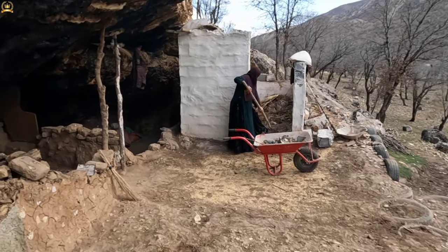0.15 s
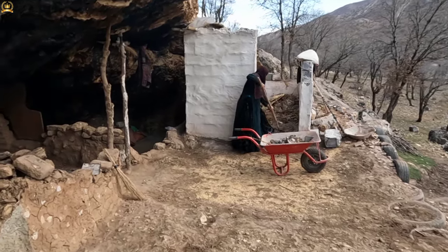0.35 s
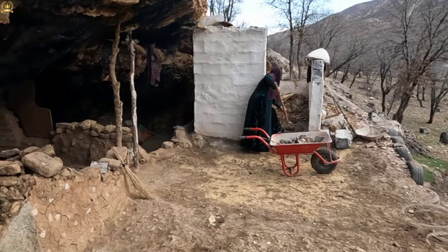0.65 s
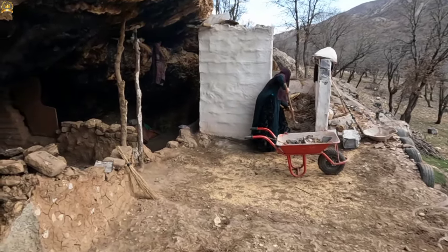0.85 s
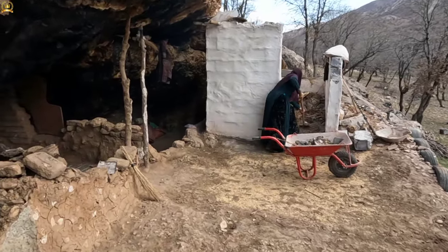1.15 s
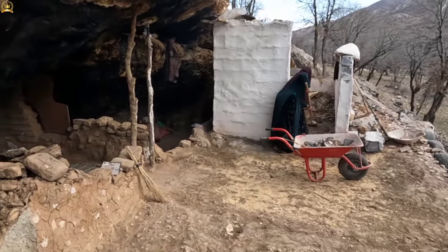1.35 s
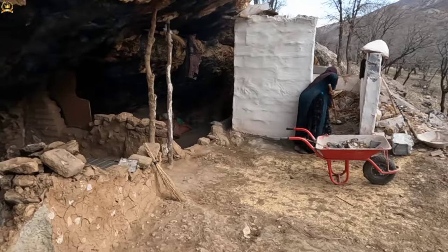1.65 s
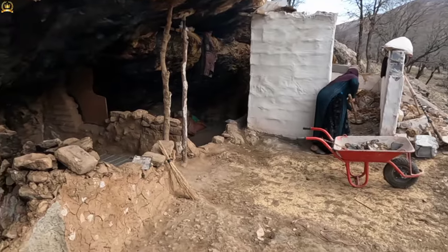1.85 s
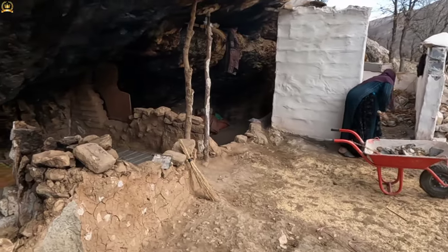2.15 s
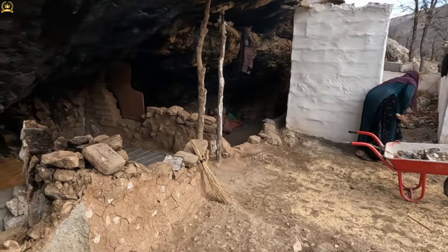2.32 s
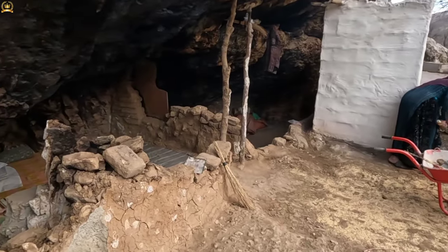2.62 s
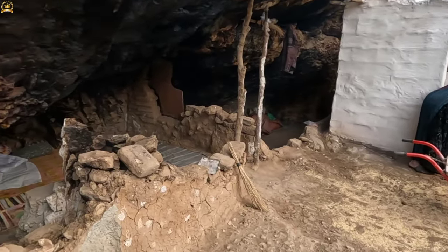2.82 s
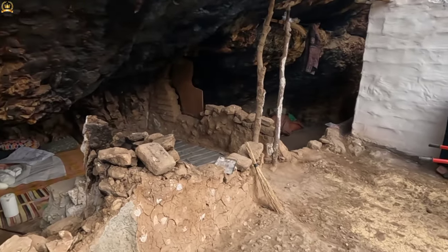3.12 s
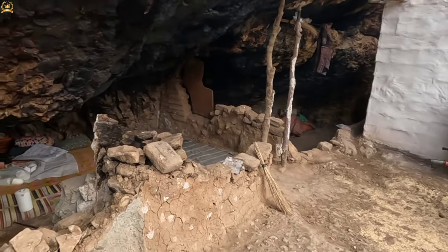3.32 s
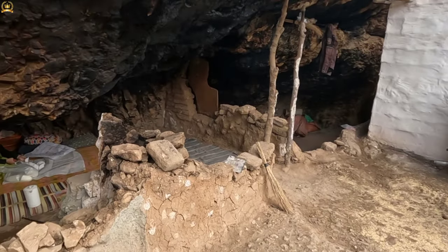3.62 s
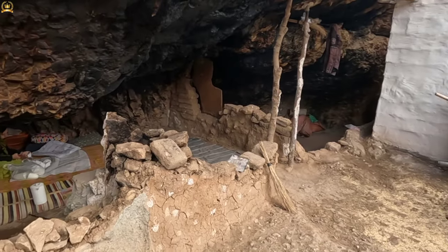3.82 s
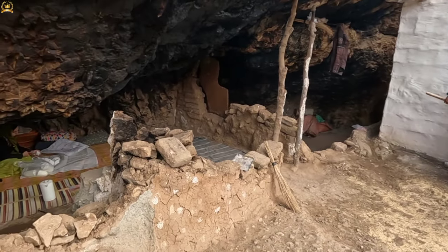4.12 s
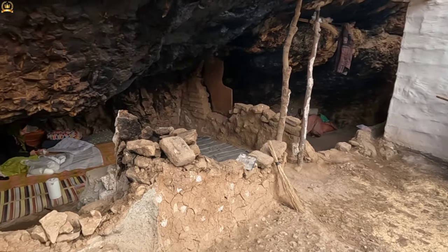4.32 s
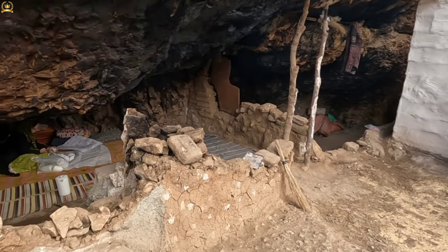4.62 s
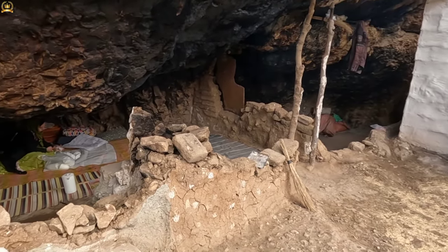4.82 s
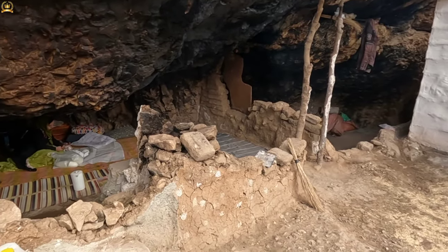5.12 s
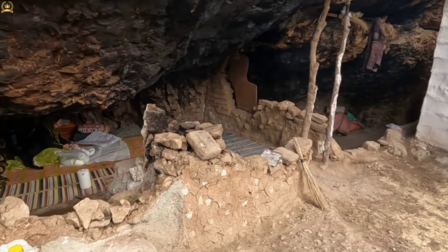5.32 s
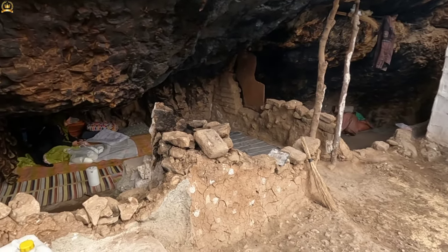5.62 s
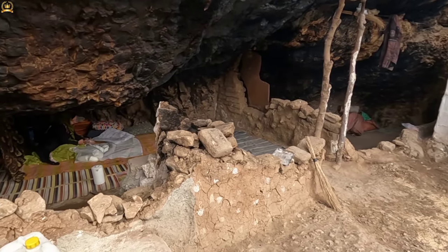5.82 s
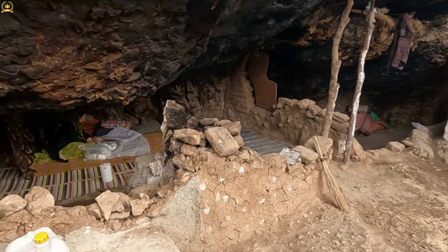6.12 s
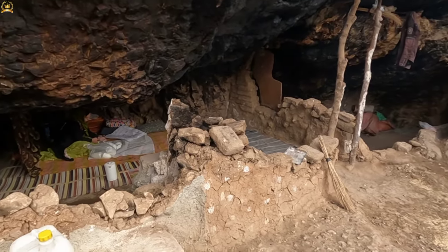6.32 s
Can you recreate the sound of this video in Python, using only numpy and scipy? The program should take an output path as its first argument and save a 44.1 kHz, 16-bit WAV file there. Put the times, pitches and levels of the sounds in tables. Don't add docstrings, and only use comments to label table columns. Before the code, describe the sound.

Digging in a stony yard under a rock overhang, heard from a hand-held camera. Light scratches and knocks grow into busy scraping with pebbles ticking on steel, then a strong jab and a lull. Tiny high bird peeps lead into the loudest cluster, earth and stones drumming dully into a metal wheelbarrow. The sound thins, then rattling scrapes return. Soft far water, low wind and dull handling thumps lie beneath.

```python
import sys
import numpy as np
from scipy import signal
from scipy.fft import rfft, irfft, next_fast_len
from scipy.io import wavfile
from scipy.ndimage import uniform_filter1d

SR = 44100
rng = np.random.default_rng(int(sys.argv[2]) if len(sys.argv) > 2 else 0)


def gain_from_decibels(decibels):
    exponent = np.asarray(decibels, float) / 20
    return 10 ** exponent


def transcribe(signal):
    frames = np.atleast_2d(signal).T
    limited = np.clip(frames, -1, 1)
    pcm = np.round(limited * 32767).astype(np.int16)
    wavfile.write(sys.argv[1], SR, pcm)


N = 284886


def evened(x):
    return x / np.sqrt(np.mean(x ** 2) + 1e-20)


def read(points, hz):
    point_hz, value = np.transpose(points)
    return np.interp(np.log(hz + 1), np.log(point_hz + 1), value)


def add(mix, start_s, sound):
    part = mix[..., max(round(start_s * SR), 0):][..., :sound.shape[-1]]
    part += sound[..., :part.shape[-1]]


def coloured(x, gain_db):
    hz = abs(np.fft.fftfreq(8192, 1 / SR))
    log_gain = np.maximum(gain_db(hz), -100) * np.log(10) / 20
    taps = np.fft.ifft(np.exp(np.conj(signal.hilbert(log_gain)))).real[:4096]
    return signal.oaconvolve(x, taps)[:len(x)]


def fence(hz, lo_hz, hi_hz):
    return -10 * np.log10((1 + (lo_hz / (hz + 1)) ** 6) * (1 + (hz / hi_hz) ** 6))


def resonate(x, hz, width_hz):
    turn = np.exp(2j * np.pi * np.cumsum(hz) / SR)
    r = np.exp(-np.pi * width_hz / SR)
    return 2 * (turn * signal.lfilter([1 - r], [1, -r], x / turn)).real


def peak(t, top_s, db, swell_s, fade_s, rounding):
    away = np.where(t < top_s, (top_s - t) / swell_s, (t - top_s) / fade_s)
    return gain_from_decibels(db - 20 * away ** rounding)


def hiss(gain_db, same, patchy_db, size):
    hz = np.fft.rfftfreq(size, 1 / SR)
    a, b, c, d, patches = rng.standard_normal((4 * N // size + 5, len(hz), 5)).T
    patches = uniform_filter1d(patches, size=9, axis=0)
    patches = evened(uniform_filter1d(patches, size=9, axis=1))
    same = np.clip(same * np.ones(len(hz)), -1, 1)[:, None]
    left = a + 1j * b
    right = same * left + np.sqrt(1 - same ** 2) * (c + 1j * d)
    frame_s = np.arange(a.shape[1]) * size / 4 / SR
    z = np.array([left, right]) * gain_from_decibels(gain_db(hz[:, None], frame_s) + patchy_db * patches)
    return evened(signal.istft(z, nperseg=size, noverlap=3 * size // 4)[1][:, :N])


def grains(count, per_s, spread_db):
    size = gain_from_decibels(spread_db * np.minimum(rng.exponential(1, count), 5))
    size = size * rng.choice([-1, 1], count)
    return size * (rng.random(count) < per_s / SR)


def valley():
    # start_s, rush_db, centre_hz
    water = [
        (0.0, -46.5, 1220),
        (1.15, -44.5, 1406),
        (1.69, -49, 1370),
        (2.39, -60, 1176),
        (4.32, -50, 1225),
        (5.27, -53.5, 1244),
        (5.828, -51, 1256),
        (6.46, -47, 1315),
    ]
    # pitch_hz, level_db
    open_air = [(53, -39), (90, -1), (114, -8), (191, -3), (270, -21.5), (551, -17), (866, -17),
                (1100, -8.5), (1300, -17.5), (1450, -13.5), (2390, -29), (7650, -35), (9690, -64.5),
                (11500, -35.5), (15600, -97)]
    # pitch_hz, likeness (0 to 1)
    likeness = [(60, 1), (180, 0.76), (550, 0.74), (1650, 0.65), (4970, 0.51), (15000, 0.14)]
    start_s, rush_db, rush_hz = np.transpose(water)
    same = read(likeness, np.fft.rfftfreq(1024, 1 / SR))

    def band_db(hz, t):
        off_centre = (hz - np.interp(t, start_s, rush_hz)) / 150
        return -20 * np.log10(1 + off_centre ** 2) + fence(hz, 1630, 3360)

    def hush_db(hz, t):
        murmur_db = 10.5 - 2.5 * t
        return read(open_air, hz) + gain_from_decibels(fence(hz, 190, 1350)) * murmur_db

    rush = hiss(band_db, same, patchy_db=1.66, size=1024)
    hush = hiss(hush_db, same, patchy_db=-2.2, size=1024)
    t = np.arange(N) / SR
    return gain_from_decibels(np.interp(t, start_s, rush_db) - 8.0) * rush + gain_from_decibels(-59.0) * hush


def wind_buffet():
    # pitch_hz, level_db
    gust = [(15, -22), (25, -8.5), (38, -11), (65, -9.5), (87, -38), (121, -27), (400, -38.5), (520, -47),
            (880, -120)]
    return hiss(lambda hz, t: read(gust, hz), 0.87, patchy_db=2.0, size=4096)


def wind(buffet):
    # start_s, level_db
    strength = [(0.0, -47.5), (0.52, -53.5), (0.59, -43), (0.7, -54.5), (1.02, -55.5), (1.33, -52),
                (1.6, -55), (2.57, -55.5), (3.71, -58), (4.59, -50), (4.75, -40.5), (4.95, -59),
                (5.59, -57.5), (6.26, -48.5), (6.46, -48)]
    # middle_s, level_db, swell_and_fade_s
    sways = [
        (0.5, -31, .3),
        (1.32, -26, .5),
        (3.2, -39, 3.5),
        (4.65, -32, .3),
        (6.15, -40, .4),
    ]
    t = np.arange(N) / SR
    sway = hiss(lambda hz, t: 2 * fence(hz, 6, 21), 0.85, patchy_db=1.0, size=8192)
    sway_level = sum(peak(t, at_s, db, span_s, span_s, 1) for at_s, db, span_s in sways)
    lean = gain_from_decibels(np.array([[-1.5], [1.5]]))
    lumps = gain_from_decibels(2.5 * evened(uniform_filter1d(rng.standard_normal(N), size=2000)))
    start_s, buffet_db = np.transpose(strength)
    return sway_level * sway * lean + gain_from_decibels(np.interp(t, start_s, buffet_db) + 2.5) * buffet * lumps


def hand(buffet):
    # start_s, level_db, swing_hz, rise_s, decay_s
    presses = [(0.71, -24.5, 50, 0.0072, 0.016), (1.212, -41, 202, 0.0016, 0.012),
               (2.065, -26, 59, 0.012, 0.011), (2.661, -20, 24.6, 0.0083, 0.025),
               (3.332, -33.5, 34, 0.0015, 0.0096), (3.512, -27, 52, 0.0043, 0.013),
               (4.656, -22, 26.5, 0.01, 0.018), (4.7112, -9.5, 25, 0.0015, 0.019),
               (5.124, -14.5, 6.7, 0.011, 0.025), (5.42, -21.5, 58, 0.014, 0.008),
               (6.216, -14, 66, 0.017, 0.014)]
    # start_s, level_db, swing_hz, rise_s, decay_s
    releases = [
        (0.467, -26, 58, .003, 0.016),
        (0.459, -18.5, 38, 0.00098, 0.0056),
        (0.51, -18, 20.8, 0.0093, 0.035),
        (5.1435, -20.5, 12, 0.0028, 0.025),
        (5.1935, -25, 37, 0.0031, 0.012),
        (5.258, -32, 35, 0.0064, 0.012),
        (2.24, -30, 50, 0.0043, 0.012),
        (4.7101, -23.5, 840, 0.00027, .0012),
    ]
    out = np.zeros((2, N))
    t = np.arange(8000) / SR
    creak = evened(np.diff(buffet, 2, prepend=0, append=0))
    bumps = [(1, *bump) for bump in presses] + [(-1, *bump) for bump in releases]
    for sign, start_s, db, swing_hz, rise_s, decay_s in bumps:
        swing = (1 - np.exp(-(t / rise_s) ** 2)) * np.exp(-t / decay_s) * np.cos(2 * np.pi * swing_hz * t)
        add(out, start_s, sign * gain_from_decibels(db + np.array([[-1.5], [1.2]])) * swing)
        shudder = creak[:, round(start_s * SR):][:, :len(t)]
        shape = np.sqrt(t / 0.013 * np.exp(1 - t / 0.0074))
        add(out, start_s, gain_from_decibels(db - 29) * shudder * shape[:shudder.shape[1]])
    return out


def pebbles(count, t60_s, spread_db):
    n = np.arange(750)
    when, loud, *tones = rng.random((count, 4)).T[:, :, None]
    rings = 0
    for tone in tones:
        hz = 850 * 12. ** tone
        fall = gain_from_decibels(-60 * n / SR / (t60_s * np.sqrt(2000 / hz)))
        rings = rings + np.sin(2 * np.pi * hz * n / SR) * fall
    rings = rings * gain_from_decibels(spread_db * np.minimum(-np.log(loud), 3.4))
    rings = rings * np.cos(.5 * np.pi * n / len(n))
    places = (when * N).astype(int) + n
    return evened(np.bincount(places.ravel(), rings.ravel(), N)[:N])


def loose_grit():
    clumps = gain_from_decibels(1.64 * evened(uniform_filter1d(rng.standard_normal(N), size=300)))
    dust = evened(grains(N, 5000, 4.2)) + 0.84 * rng.standard_normal(N)
    return clumps * (0.61 * dust + 0.67 * pebbles(count=8000, t60_s=0.046, spread_db=1.5))


def blade_layers(grit):
    # pitch_hz, level_db
    grit_colour = [(150, -66), (250, 1), (693, 3), (824, -5.5), (1110, 0.5), (2030, 2.5), (2290, -2.5),
                   (3180, 6.5), (7800, -3), (12000, -19), (15600, -34)]
    # pitch_hz, width_hz, level_db
    blade = [(1100, 59, 0), (1540, 310, -6.5), (1930, 13.5, -5), (2500, 160, 1.5), (2760, 83, -3),
             (3064, 40, -8.5), (3625, 44, -5.5)]
    # start_s, pitch_hz
    scoop = [(1.0, 1490), (1.78, 1550), (1.84, 1580), (1.96, 880), (2.3, 1370), (2.77, 1340), (3.3, 1164),
             (4.43, 1500), (4.61, 1420), (4.734, 945), (5.274, 1190), (6.07, 1300), (6.2, 1640),
             (6.46, 1310)]

    def steel_db(hz):
        rings = sum(gain_from_decibels(db + 4.0) / (1 + (2 * (hz - f) / (0.95 * width)) ** 2) for f, width, db in blade)
        return read(grit_colour, hz) + 10 * np.log10(1 + rings)

    earth = evened(coloured(grit, lambda hz: steel_db(hz) + fence(hz, 770, 1530)))
    rattle = evened(coloured(grit, lambda hz: steel_db(hz) + fence(hz, 2195, 7320)))
    sand = evened(coloured(grit, lambda hz: read(grit_colour, hz) + fence(hz, 5100, 28000)))
    hollow_hz = np.interp(np.arange(N) / SR, *np.transpose(scoop))
    hollow = evened(resonate(earth, hollow_hz, width_hz=620))
    return rattle, 0.53 * earth + 0.67 * hollow, sand


def strokes(rattle, earth, sand):
    # hardest_s, rattle_db, swell_s, fade_s, earth_weight_db
    drags = [(0.04, -63.5, 0.13, 0.013, -32), (0.331, -50, 0.021, 0.14, 1.5), (0.64, -51, 0.24, 0.057, -3),
             (1.06, -51, 0.094, 0.4, 3), (1.22, -59, 0.25, 0.53, -6), (1.654, -42.5, 0.04, 0.14, -16),
             (1.75, -33.5, 0.11, 0.093, -3.5), (1.89, -52, 0.1, 0.064, 6), (2.05, -63.5, 0.091, 0.18, -1),
             (2.415, -46, 0.095, 0.07, -1), (2.69, -58.5, 0.13, .03, -65), (2.773, -33, 0.076, 0.047, -2.5),
             (2.84, -53.5, 0.031, 0.045, -4), (2.99, -60.5, 0.094, 0.12, 0.5),
             (3.12, -61.5, 0.071, 0.12, -4), (1.94, -66, .1, 0.09, -5), (1.56, -65, 0.12, .1, -6),
             (4.552, -48.5, 0.078, 0.25, 4), (4.7, -45, 0.084, 0.38, -40), (4.99, -48, .08, 0.26, -6),
             (4.83, -46.5, 0.21, 0.09, 0.5), (4.905, -35, 0.01, 0.13, 6.5), (5.12, -55, 0.074, 0.23, 2.5),
             (5.26, -63, 0.04, 0.068, -2.5), (6.048, -42.5, 0.041, 0.14, -1), (6.2, -41, 0.025, 0.21, -7),
             (6.32, -38.5, 0.097, 0.25, -5), (6.438, -42.5, .12, 0.061, -4.5)]
    # hardest_s, rattle_db, fade_s, earth_weight_db
    jolts = [(0.49, -52, .1, 1), (2.36, -54, 0.11, -20), (0.304, -54.5, .1, 7.5),
             (5.982, -54.5, 0.23, -1.5), (0.153, -43, 0.058, -16), (0.512, -39, 0.037, -6),
             (1.12, -37, 0.061, -3), (1.52, -43, 0.02, -14), (1.982, -47, 0.041, -5),
             (2.709, -42.5, 0.13, 8), (4.866, -33, 0.064, -42), (5.066, -33, 0.048, -50),
             (5.546, -65.5, 0.29, 1.5), (6.134, -41, 0.03, -22)]
    t = np.arange(N) / SR
    steps = t[::64]
    moves = [(*drag, 1.44) for drag in drags]
    moves += [(top_s, db, 0.012, fade_s, weight_db, 1.05) for top_s, db, fade_s, weight_db in jolts]
    power = 0
    for top_s, db, swell_s, fade_s, weight_db, rounding in moves:
        sand_db = -6.5 - 0.11 * (db + 45) - 0.098 * weight_db
        shares = gain_from_decibels(np.array([[0], [weight_db], [sand_db]]))
        power = power + (peak(steps, top_s, db, swell_s, fade_s, rounding) * shares) ** 2
    layers = zip(power, (rattle, earth, sand))
    return sum(np.interp(t, steps, np.sqrt(p)) * layer for p, layer in layers)


def trickle(rattle, sand):
    level_db = np.interp(np.arange(N) / SR, [0.8, 1.2, 2.2, 3.7], [-83.0, -82.0, -74.5, -84.0])
    return gain_from_decibels(level_db) * (rattle + 2.24 * sand)


def slide(grit):
    t = np.arange(N) / SR
    sinking_hz = np.clip(1430 - 9000 * (t - 1.9), 600, 2200)
    level = peak(t, 1.9, db=-50, swell_s=0.06, fade_s=0.11, rounding=1.44)
    return level * evened(resonate(grit, sinking_hz, width_hz=360))


def singing(grit):
    # start_s, length_s, pitch_hz, level_db
    sings = [(0.32, 0.049, 4100, -57.5), (0.325, 0.025, 3120, -54), (0.37, 0.064, 4160, -63),
             (0.34, .09, 8570, -67), (0.36, .08, 7200, -76), (0.485, 0.075, 2710, -56),
             (0.52, 0.045, 4300, -59), (0.583, 0.08, 8900, -64), (0.61, 0.037, 3640, -63),
             (0.6, 0.077, 6140, -65), (1.042, 0.026, 2650, -48), (1.045, 0.033, 1610, -48),
             (1.11, 0.038, 2850, -50), (1.105, 0.022, 3030, -48), (1.185, 0.03, 2300, -57),
             (1.185, 0.027, 1730, -43.5), (1.31, .07, 3090, -64), (1.405, 0.037, 4250, -68),
             (1.413, .035, 1580, -46.5), (1.42, .04, 3127, -58), (1.52, 0.03, 3500, -58.5),
             (1.662, .11, 3340, -44.5), (1.715, .04, 2500, -46), (1.7, 0.056, 1700, -41),
             (1.69, 0.14, 4590, -55), (4.51, 0.047, 1890, -49), (4.51, 0.086, 2590, -50),
             (4.51, 0.09, 2760, -51), (4.55, 0.055, 1747, -47), (4.545, 0.15, 1127, -53.5),
             (4.56, 0.083, 1404, -51), (4.46, 0.044, 1940, -62), (4.62, .03, 2950, -55),
             (4.74, 0.11, 4930, -57.5), (4.77, 0.065, 3520, -56.5), (6.0, 0.15, 1730, -51),
             (6.035, 0.047, 1153, -45.5), (6.035, .04, 3530, -50), (6.04, 0.036, 4700, -55),
             (6.06, 0.04, 1900, -57), (6.13, 0.13, 3110, -49.5), (6.13, 0.086, 2560, -45),
             (6.13, 0.018, 3780, -43), (6.19, 0.041, 1920, -44), (6.21, 0.068, 1530, -50),
             (6.26, 0.14, 3100, -51), (6.26, .2, 2495, -45), (6.3, .16, 1634, -47), (6.3, 0.11, 2775, -56),
             (6.3, 0.14, 1114, -46.5)]
    out = np.zeros(N)
    for start_s, length_s, hz, db in sings:
        feed = grit[round(start_s * SR):][:round(1.3 * length_s * SR)]
        width_hz = hz / 60 * max(1, hz / 5000) ** 2
        ring = resonate(feed, np.full(len(feed), float(hz)), width_hz)
        u = np.linspace(0, 1, len(feed))
        swell = np.minimum(u / 0.2, 1) * np.cos(.5 * np.pi * u ** 2)
        add(out, start_s, gain_from_decibels(db) * evened(ring) * swell)
    return out


def scrape():
    grit = loose_grit()
    rattle, earth, sand = blade_layers(grit)
    return strokes(rattle, earth, sand) + trickle(rattle, sand) + slide(grit) + singing(grit)


def barrow():
    # start_s, peak_db, tumble_s, boom_db
    clods = [(1.215, -28, 0.0079, -46), (2.703, -33.5, 0.058, -34), (2.739, -32.5, 0.035, -34),
             (3.122, -45, 0.033, -14), (4.725, -31.5, 0.036, -12.5), (4.802, -20, 0.029, -29),
             (4.822, -18.5, 0.014, -19.5), (4.861, -23.5, 0.058, -38), (4.904, -14, 0.035, -19),
             (4.94, -19, 0.027, -19.5), (5.007, -36.5, 0.14, -20), (0.137, -50, 0.015, -19),
             (1.051, -45, .02, -13.5), (1.128, -43.5, 0.024, -12), (1.701, -41.5, 0.1, -27),
             (1.789, -41.5, 0.027, -24), (2.387, -42.5, .04, -34), (3.176, -48.5, 0.023, -26),
             (4.561, -40, 0.052, -21), (5.24, -49, 0.045, -15), (6.06, -40, .03, -35),
             (6.147, -46.5, 0.015, -13), (6.297, -55, .04, -20), (6.366, -43, 0.044, -19.5)]
    # pitch_hz, level_db, t60_s (time to fall 60 dB)
    tray_rings = [(445, -10.5, 0.85), (488, 3.5, 0.98), (641, 5.5, 0.42), (701, 4, 0.42), (734, 9, 0.55),
                  (799, 8, 0.28), (994, 7, 0.55), (1040, 3, 0.36), (1154, 1, 0.54), (1225, 0, 0.453),
                  (1290, 5, 0.19), (1460, -2, 0.5), (1730, -4, 0.31), (2010, -19, 0.28)]
    # pitch_hz, level_db
    heap = [(150, -48), (250, 9.5), (538, 0), (983, 4), (1860, -2.5), (3100, -11), (4000, -29), (5200, -34),
            (8800, -120)]
    t = np.arange(9000) / SR
    drive, boom = np.zeros(N), np.zeros(N)
    for start_s, db, tumble_s, boom_db in clods:
        tumble = np.exp(-t / tumble_s) * evened(grains(len(t), 3000, 2.2))
        tumble[:60] += 0.48 * np.hanning(60) ** 4
        add(drive, start_s, gain_from_decibels(db) * tumble)
        swell = (1 - np.exp(-t / 0.0073)) * gain_from_decibels(-60 * t / 0.14)
        add(boom, start_s, gain_from_decibels(db + boom_db + 16.0) * swell * np.sin(2 * np.pi * 176.2 * t))
    tray = 0
    for hz, db, t60_s in tray_rings:
        damped_s = np.clip(0.24 * t60_s, .05, .25)
        tray = tray + gain_from_decibels(db - 60 * t / damped_s) * np.sin(2 * np.pi * hz * t)
    dull = coloured(np.eye(1, 4096)[0], lambda hz: read(heap, hz))
    body = 0.77 * tray[:4096] / np.linalg.norm(tray) + 1.04 * dull / np.linalg.norm(dull)
    return gain_from_decibels(-11.0) * signal.oaconvolve(drive, body)[:N] + boom


def knocks():
    # start_s, peak_db, ring_hz, thud_db, t60_s
    chips = [(0.153, -22, 4120, -25, 0.025), (0.5199, -25.5, 1720, -4, 0.16),
             (1.0172, -32, 3300, -9, 0.044), (2.7018, -26, 2700, -1, 0.13), (2.767, -13.5, 4200, -21, 0.12),
             (5.162, -35.5, 5830, -20, 0.014), (5.0657, -12.5, 9030, -16, 0.024),
             (0.812, -49, 5780, -12, .03), (5.129, -50, 9500, -19.5, .02), (5.784, -48, 2360, -38, 0.055),
             (6.0431, -20, 1930, -18.5, 0.073)]
    stones = [(0.142, -25.5, 3950, -11, 0.013), (0.3279, -30, 1930, -31, 0.094),
              (0.6123, -32, 3790, 0, 0.19), (1.7298, -13, 1900, -17, 0.017),
              (1.843, -19.5, 1460, -18, 0.036), (1.8846, -23.5, 1390, -1.5, 0.064),
              (1.9775, -22.5, 2160, -8.5, 0.017), (2.7395, -16.5, 1460, -1, 0.2),
              (4.555, -24.5, 1780, -37, 0.15), (4.72, -30, 6670, -1.5, 0.2),
              (4.8648, -13, 3250, -11, 0.096), (5.54, -42, 1970, -13, 0.077),
              (5.587, -48.5, 2980, -19.5, 0.062), (5.685, -52, 2820, -13, 0.037)]
    dry_lumps = [(1.047, -23, 1510, -27, 0.12), (1.111, -24.5, 3220, -31, 0.1),
                 (1.123, -24.5, 1460, -12, 0.14), (1.1869, -26, 2480, -31, 0.096),
                 (1.3175, -32.5, 3190, -8, 0.33), (1.408, -37, 1550, -4, 0.15),
                 (1.5179, -30, 2800, -11.5, 0.13), (4.9006, -10, 2880, -1, 0.16),
                 (5.0577, -22, 1870, -25, 0.041), (6.133, -18, 2980, -14.5, 0.12),
                 (6.3679, -30, 2330, 1.5, 0.38)]
    ticks = [(2.998, -47, 1240, 5, 0.05), (2.779, -27, 4300, -19, 0.04), (1.096, -28, 1460, -7, 0.073),
             (1.165, -35, 4600, -20, 0.058), (1.270, -35, 4050, -25, 0.072), (1.345, -45, 4700, -23, 0.072),
             (1.42, -33, 1540, -4.5, 0.16), (1.465, -42, 3000, -20, 0.066), (1.631, -35, 3000, -8, .08),
             (1.655, -26, 3100, -11.5, 0.23), (1.698, -27, 3200, -21, 0.06), (1.742, -31, 1500, -8, .06),
             (1.795, -27.5, 1180, -4, 0.058), (1.869, -25, 1460, -4, 0.033), (1.988, -29, 4860, -8, 0.089),
             (2.018, -50.5, 1010, 14, 0.033), (4.495, -34, 1930, -20, 0.079), (4.513, -34, 2610, -27, 0.28),
             (4.625, -29, 1370, -11, 0.11), (4.687, -31.5, 2340, -20, 0.046), (5.241, -48, 1980, -14, 0.1),
             (5.996, -37.5, 1840, -20, 0.11), (6.016, -33.5, 1840, -20, 0.073),
             (6.080, -30, 1900, -11, 0.056), (6.167, -23.5, 2980, -20, 0.062),
             (6.212, -26.5, 1580, -25, 0.19), (6.288, -24.5, 1840, -15, 0.1), (6.312, -24, 3080, -22, .08),
             (6.342, -24, 2180, -25, 0.071), (6.426, -23, 2480, -6, 0.13)]
    # pitch_hz, level_db
    crack_colour = [(590, -5), (1000, -26.5), (1240, 7), (2880, 0.5), (3750, 1), (4770, 0.5), (7220, -5),
                    (9400, -16), (15600, -36)]
    kinds = (chips, -5), (stones, -9.5), (dry_lumps, -28), (ticks, -21.5)
    t, out = np.arange(6000) / SR, np.zeros(N)
    for start_s, db, ring_hz, thud_db, t60_s, hard_db in [(*row, hard) for rows, hard in kinds for row in rows]:
        fall = gain_from_decibels(-60 * t / np.clip(t60_s, .01, .3))
        splinters = evened(grains(len(t), 2700, 11.3))
        blow = fall * (rng.standard_normal(len(t)) * 0.63 + splinters * 0.27)
        blow[0] += 4
        overtones_hz = ring_hz * np.append(1, rng.uniform(1.15, 2.725, 3))[:, None]
        strengths = np.array([[2.2], [.5], [.5], [.5]])

        def crack_db(hz):
            rings = (strengths / (1 + ((hz - overtones_hz) / 150) ** 2)).sum(0)
            edge_db = (hard_db + 17.5) * gain_from_decibels(fence(hz, 6100, 30200))
            return read(crack_colour, hz) + 10 * np.log10(1 + 24 * rings) + edge_db

        crack = coloured(blow, crack_db)
        thud = coloured(blow, lambda hz: fence(hz, 734, 1320))
        add(out, start_s, gain_from_decibels(db - 3.5) * (crack / abs(crack).max() + gain_from_decibels(thud_db) * thud / abs(thud).max()))
    return out


def bird():
    # start_s, length_s, pitch_hz, level_db
    peeps = [
        (4.228, 0.082, 6600, -66.5),
        (4.253, 0.084, 7050, -71),
        (4.333, 0.06, 6680, -67.5),
        (4.372, 0.05, 6500, -68),
        (4.42, .024, 6880, -70),
        (4.445, 0.058, 6510, -69),
    ]
    out = np.zeros(N)
    for start_s, length_s, hz, db in peeps:
        t = np.arange(0, length_s, 1 / SR)
        flutter = evened(uniform_filter1d(rng.standard_normal(len(t)), size=400))
        waver = 1 + 0.35 * flutter
        pitch_hz = hz - 2800 * (t - length_s / 2) + 45 * flutter[::-1]
        tone = np.sin(2 * np.pi * np.cumsum(pitch_hz) / SR)
        add(out, start_s, gain_from_decibels(db) * waver * tone * signal.windows.tukey(len(t), .6))
    return out


def overhang(x):
    # pitch_hz, t60_s
    echo_t60 = [(150, 1), (1200, 0.071), (4000, 0.033), (12000, 0.035)]
    taps = np.zeros((2, SR // 2))
    at = np.arange(60, SR // 2 - 20, 20) + rng.integers(0, 20, (2, (SR // 2 - 61) // 20))
    np.put_along_axis(taps, at, rng.choice([-1., 1.], at.shape), 1)
    hz, t, z = signal.stft(taps, SR, nperseg=256)
    fall = gain_from_decibels(-60 * t / read(echo_t60, hz)[:, None])
    tail = signal.istft(z * fall, SR, nperseg=256)[1]
    return signal.fftconvolve(x[None], tail / np.linalg.norm(tail[0]), axes=1)[:, :N]


def scattered(x):
    # pitch_hz, level_db
    side_share = [(200, -17), (700, -14.5), (1400, -22), (3100, -8), (6800, -10.5), (14000, -1)]
    hz, t, z = signal.stft(x, SR, nperseg=256)
    a, b = rng.standard_normal((len(t), len(hz), 2)).T
    sides = uniform_filter1d(a, size=3, axis=0) + 1j * uniform_filter1d(b, size=3, axis=0)
    sides = uniform_filter1d(sides, size=2, axis=1) * np.sqrt(3)
    side = signal.istft(z * sides * gain_from_decibels(read(side_share, hz))[:, None], SR, nperseg=256)[1][:N]
    return side * np.array([[1], [-1]])


def two_microphones(work):
    # pitch_hz, difference_db
    lean = [(150, -1), (600, -0.5), (2000, -1), (5000, -1), (9000, 1), (14000, 13.5)]
    # pitch_hz, lead_radians
    lag = [(150, 0.3), (800, -0.15), (1800, -0.94), (2700, -0.79), (3500, -0.98), (5000, -0.43),
           (9000, -0.42), (13000, -1.4)]
    size = next_fast_len(N)
    hz = np.fft.rfftfreq(size, 1 / SR)
    half = np.array([[.5], [-.5]])
    shaded = rfft(work, size) * gain_from_decibels(half * read(lean, hz) + 2 * fence(hz, 0.84, 16500))
    return irfft(shaded * np.exp(1j * half * read(lag, hz)), size)[:, :N]


def scene():
    work, peeps = scrape() + barrow() + knocks(), bird()
    echo = overhang(coloured(work + peeps, lambda hz: fence(hz, 1490, 30000)))
    work = gain_from_decibels(-0.5) * work + gain_from_decibels(-6.0) * echo + scattered(work)
    buffet = wind_buffet()
    return two_microphones(work) + peeps + valley() + wind(buffet) + hand(buffet)


def top_cut(x):
    return signal.sosfilt(signal.butter(12, 15730, fs=SR, output="sos"), x)


def record(dry):
    low_pass = signal.firwin(255, 15700, window=("kaiser", 8), fs=SR)
    limited = signal.oaconvolve(dry, low_pass[None], "same")
    return top_cut(limited)


dry = scene()
out = record(dry)
transcribe(out)
```